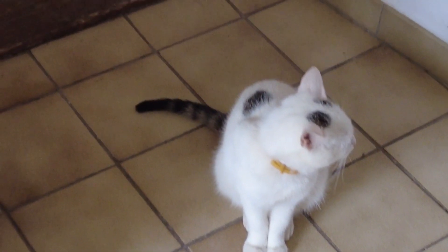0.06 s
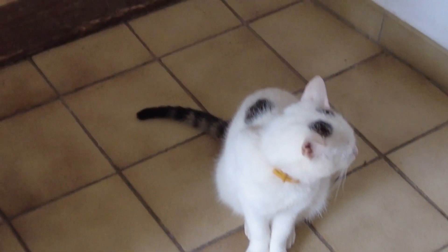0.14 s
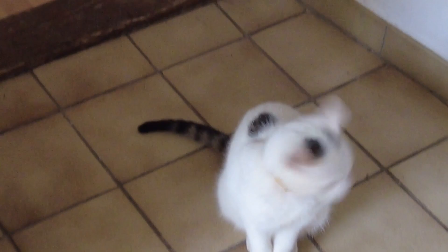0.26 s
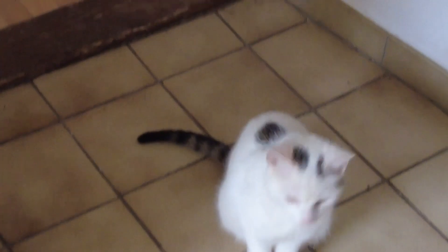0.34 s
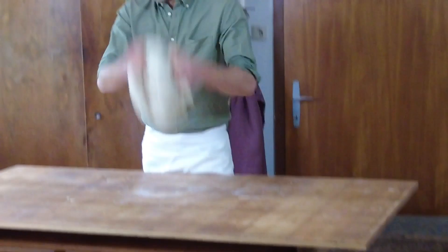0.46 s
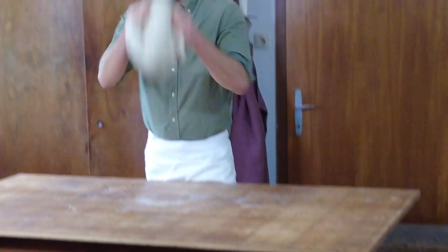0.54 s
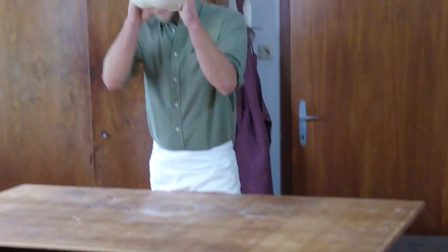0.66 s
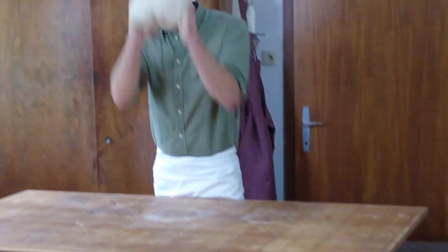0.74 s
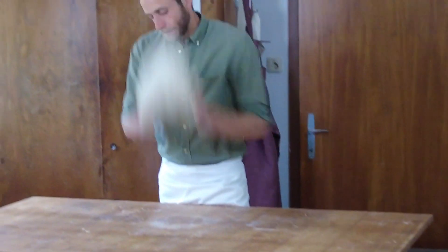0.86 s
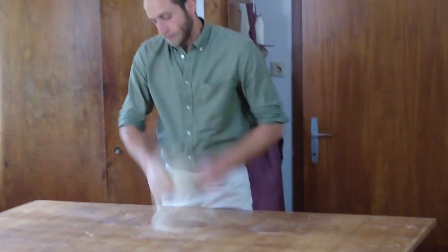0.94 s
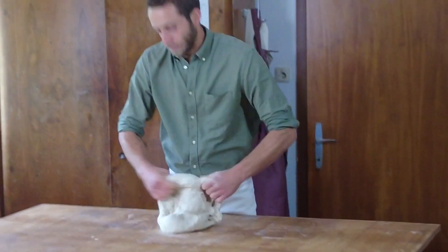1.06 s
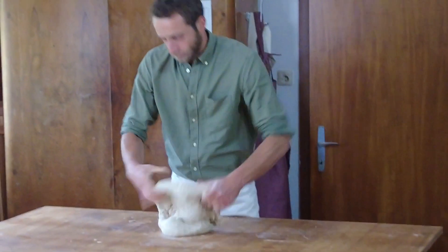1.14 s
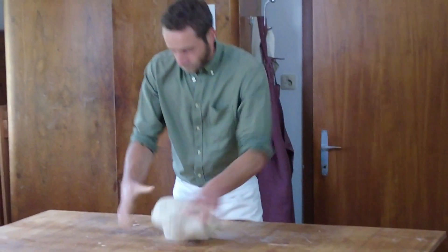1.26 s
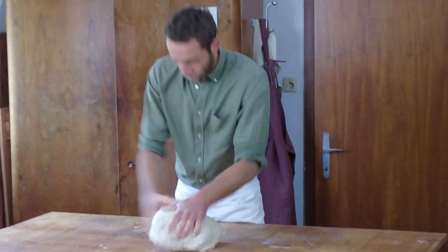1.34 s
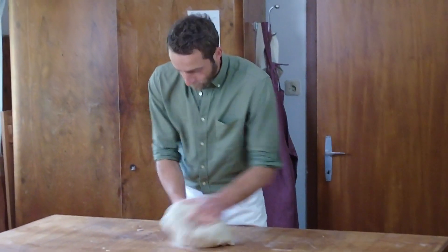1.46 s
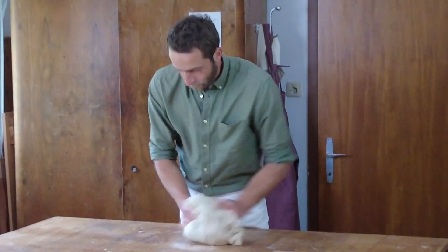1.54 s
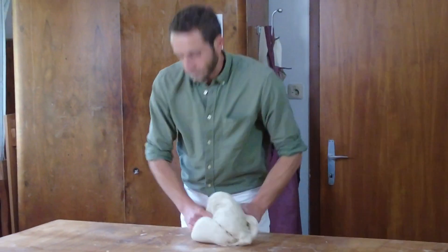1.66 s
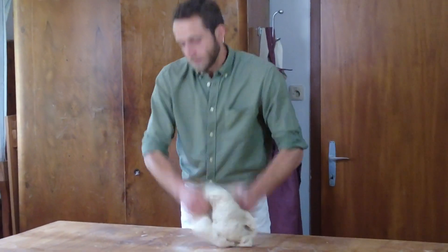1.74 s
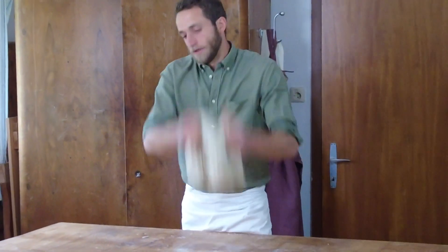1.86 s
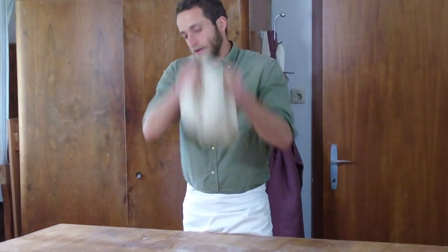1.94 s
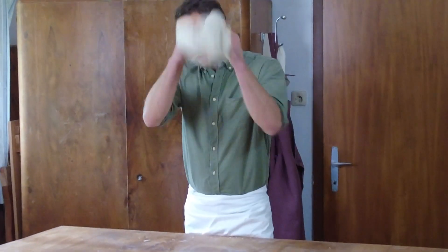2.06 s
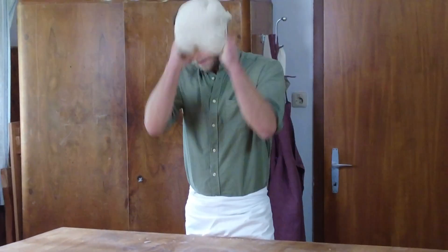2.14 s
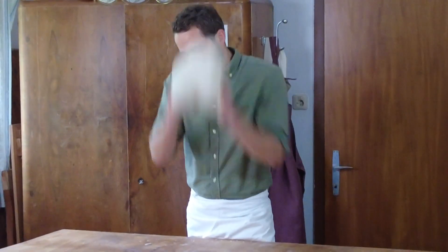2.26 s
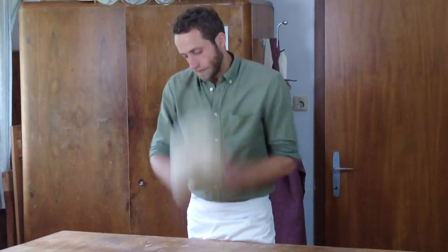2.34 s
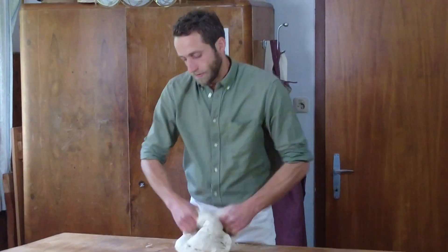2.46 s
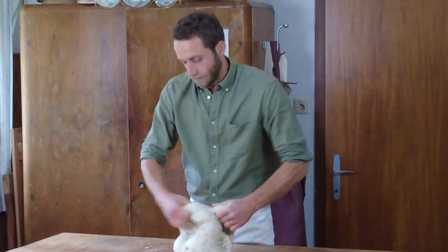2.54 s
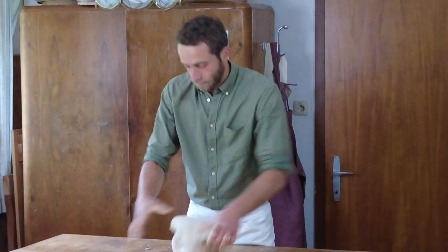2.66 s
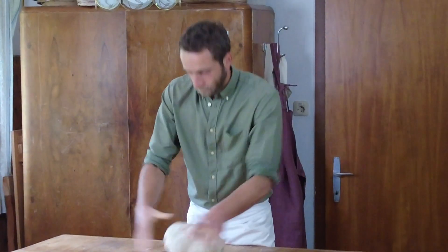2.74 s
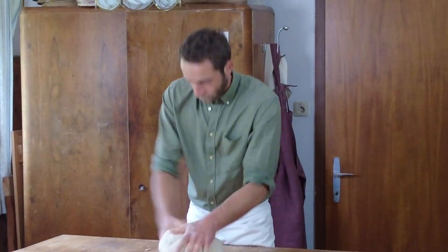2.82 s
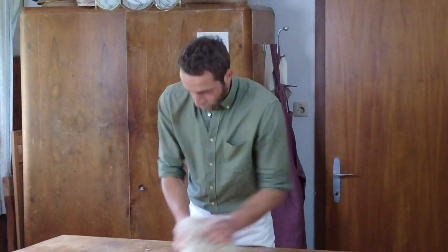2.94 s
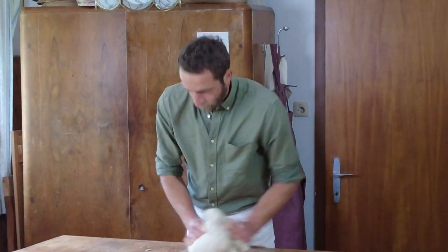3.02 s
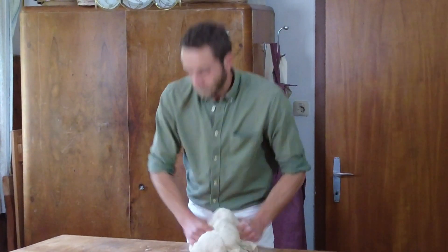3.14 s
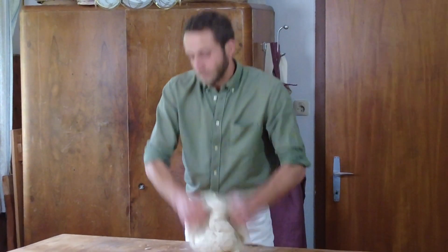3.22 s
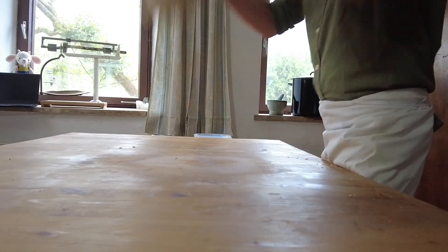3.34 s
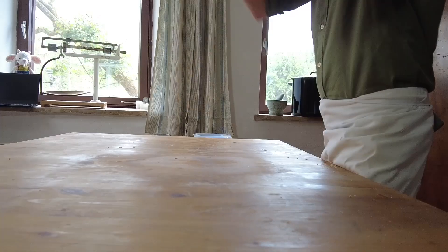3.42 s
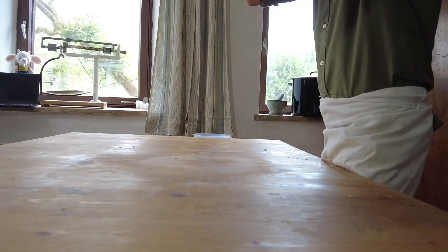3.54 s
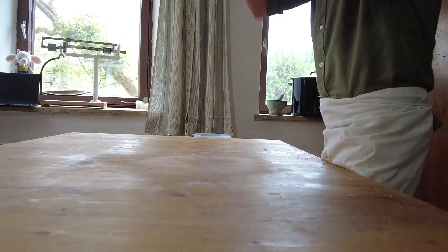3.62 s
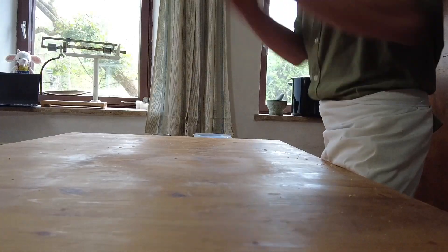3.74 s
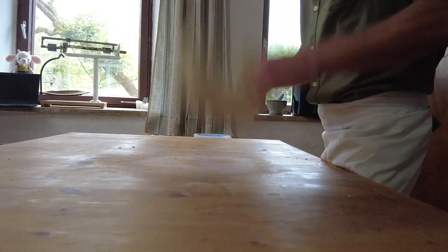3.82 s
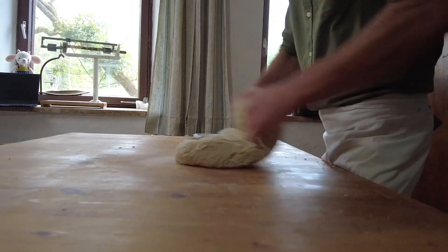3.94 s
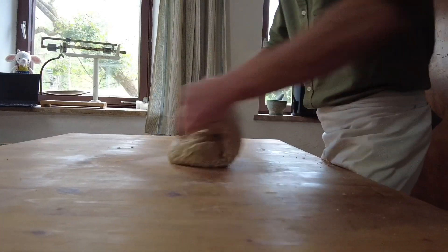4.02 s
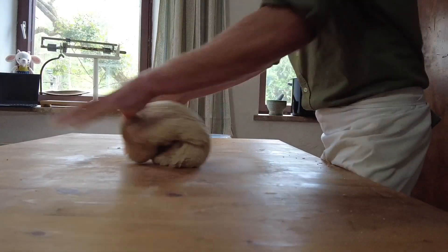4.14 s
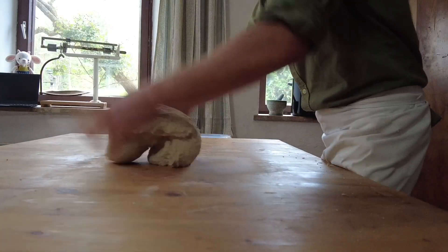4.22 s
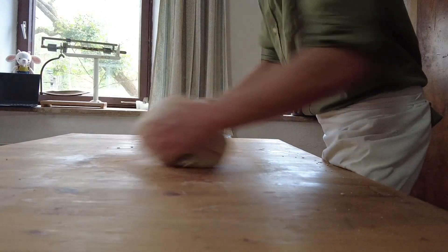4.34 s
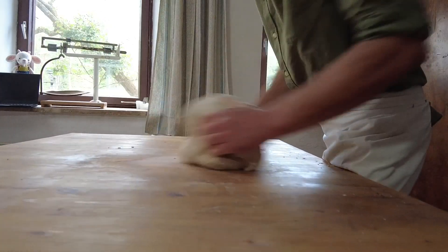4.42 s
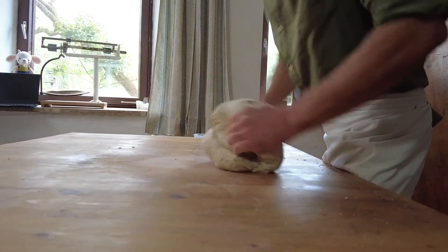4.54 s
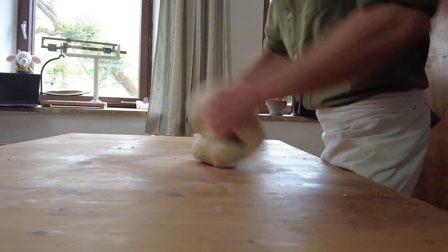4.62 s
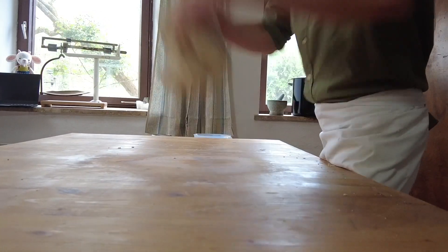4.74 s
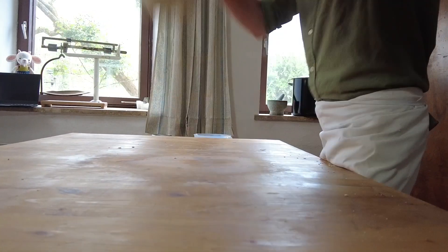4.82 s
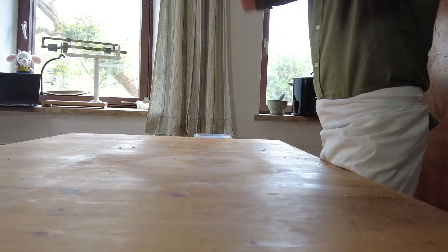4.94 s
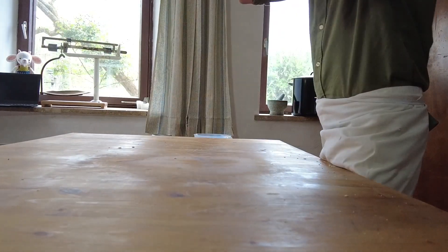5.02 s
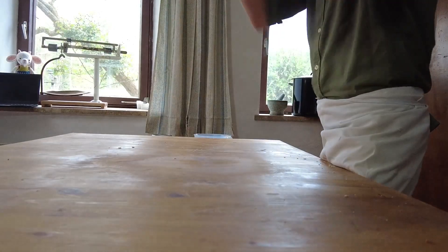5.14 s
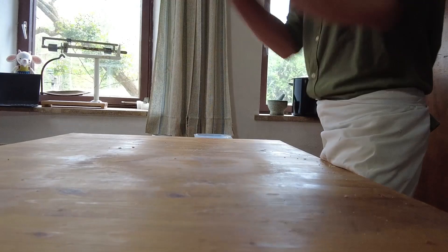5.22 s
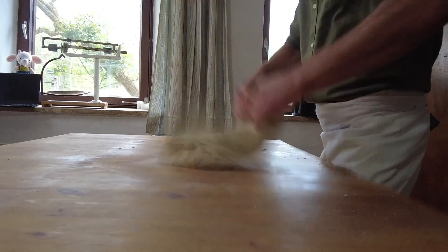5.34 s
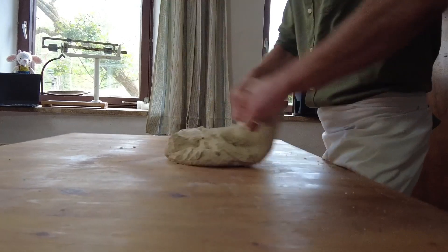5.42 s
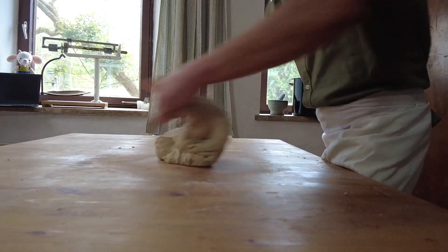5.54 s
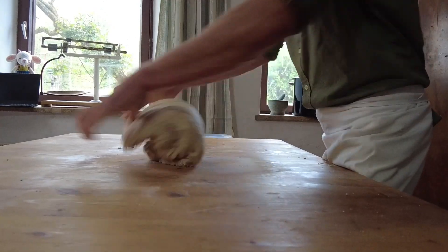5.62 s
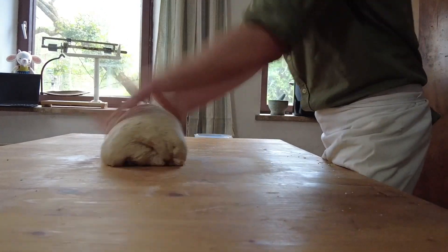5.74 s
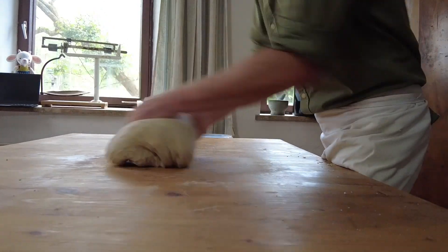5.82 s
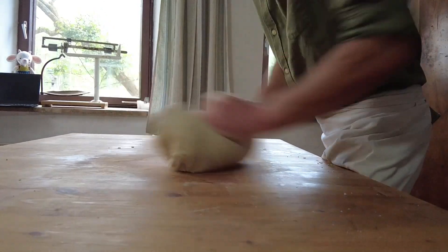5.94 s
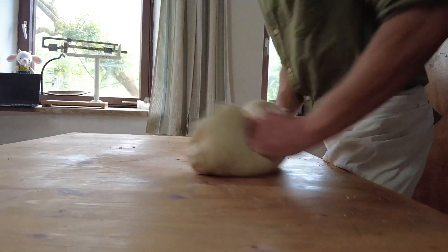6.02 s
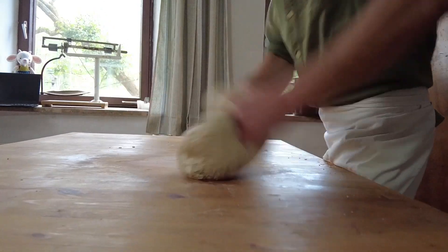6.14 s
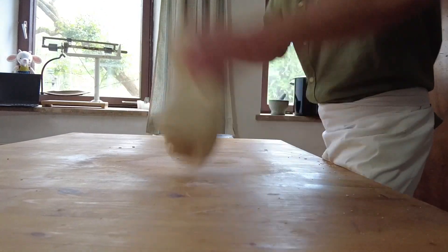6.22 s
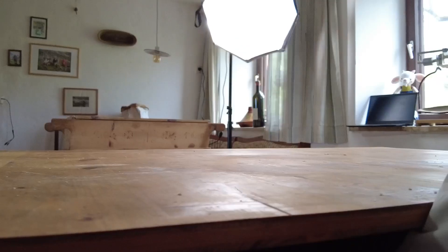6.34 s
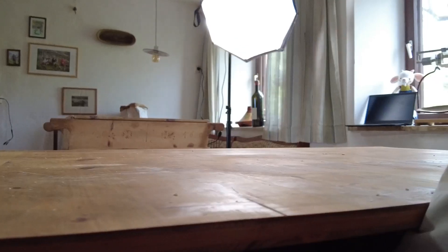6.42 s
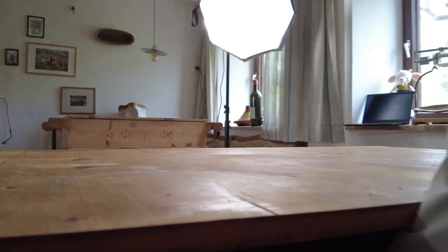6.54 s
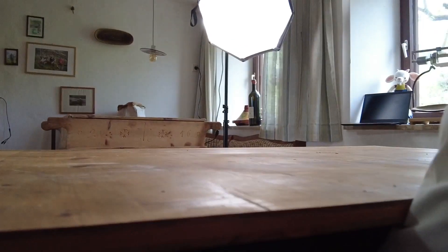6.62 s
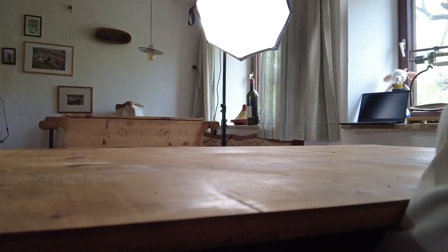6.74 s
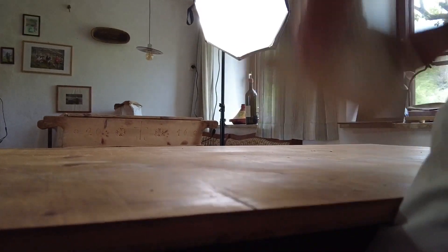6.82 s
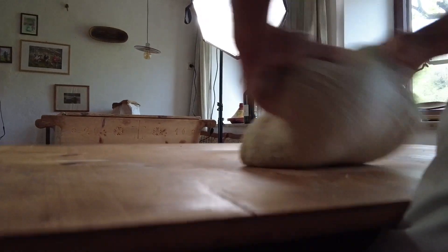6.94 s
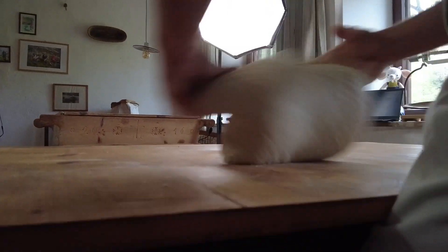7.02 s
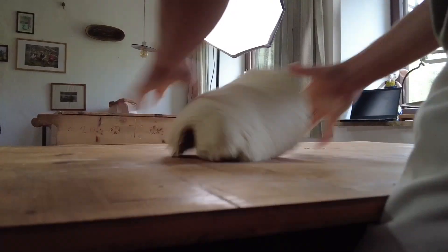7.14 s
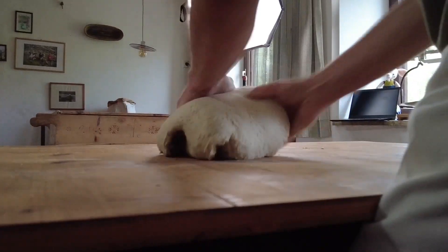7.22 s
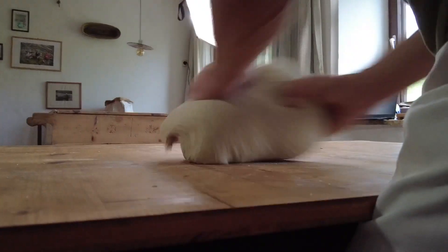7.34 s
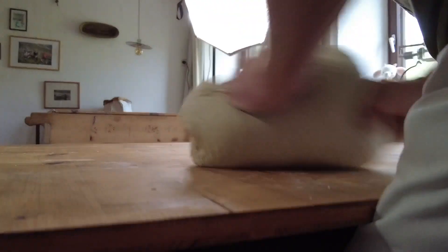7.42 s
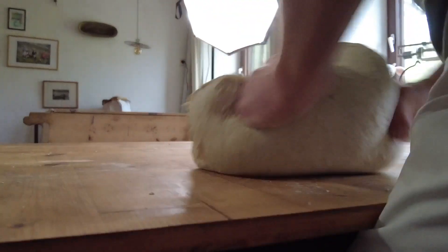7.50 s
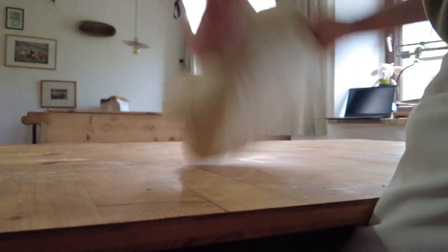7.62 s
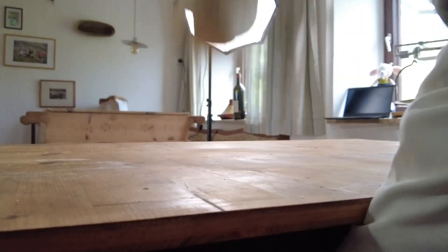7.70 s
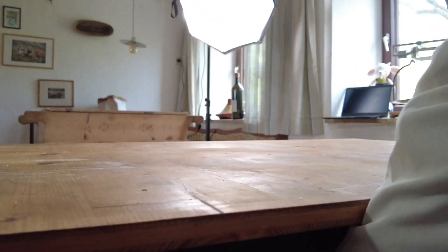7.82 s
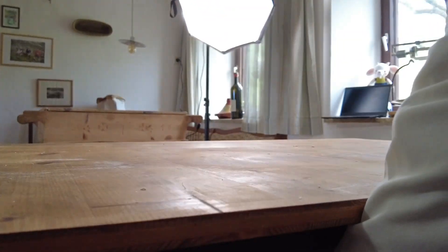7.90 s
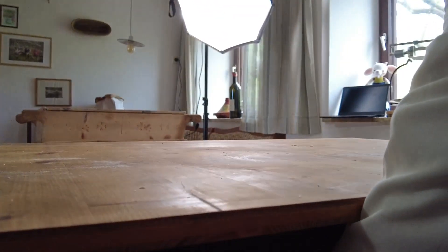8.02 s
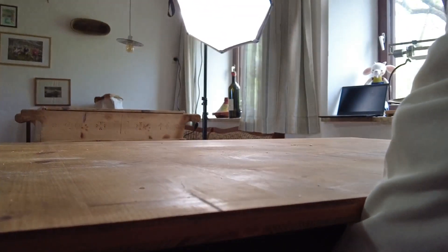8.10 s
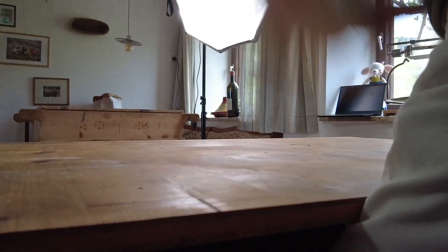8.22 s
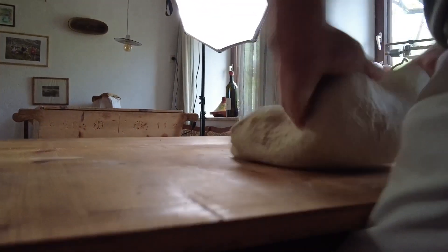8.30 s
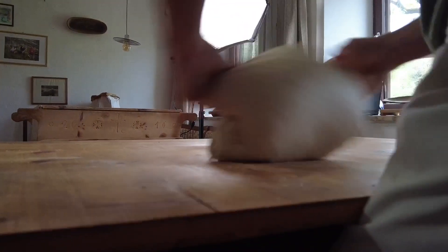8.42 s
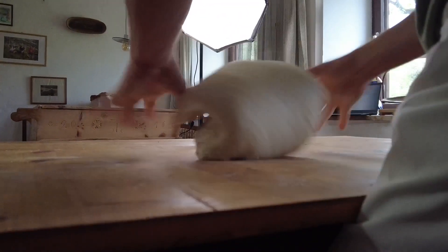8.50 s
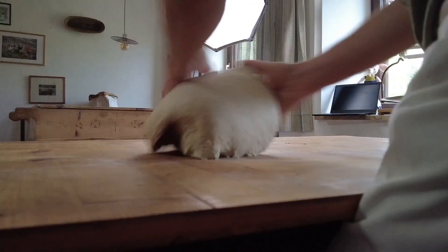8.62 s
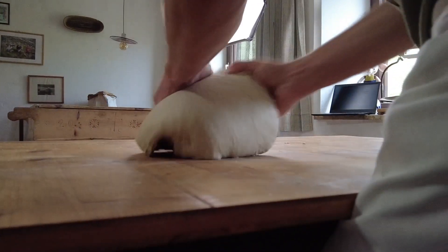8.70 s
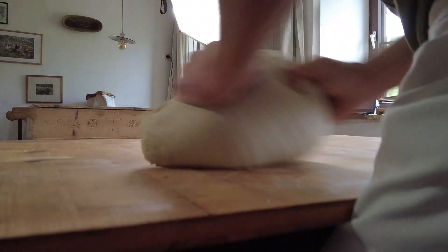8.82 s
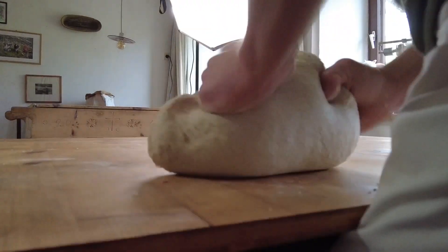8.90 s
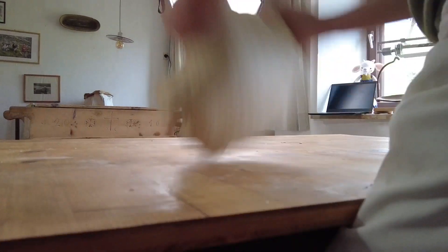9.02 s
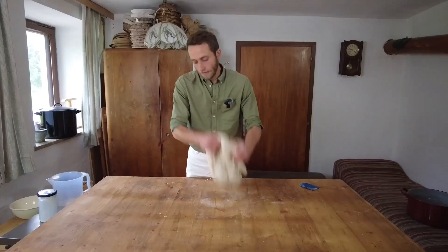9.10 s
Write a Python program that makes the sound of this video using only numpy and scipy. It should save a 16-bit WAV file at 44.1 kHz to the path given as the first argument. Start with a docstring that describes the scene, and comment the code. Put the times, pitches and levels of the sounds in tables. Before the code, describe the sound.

Six hard, booming dough slaps ring a big wooden table, growing closer, separated by dull thuds, squelches and faint sticky handling.

```python
"""A lump of dough tips onto a big wooden table with a dull thud and scrape, then a baker slams it six times.
Each slam is a crack of noise, ringing board modes, a late squelch, wall bounces and a decaying room tail.
Between slams hands pat, fold, grab, lift and catch the dough: coloured click bursts and damped thuds.
The microphone stands across a bare, echoing kitchen, then at the table's end, then at its edge;
a limiter ducks the slams above a steady faint hush."""
import sys
import numpy as np
from scipy import signal
from scipy.fft import rfft, irfft, next_fast_len
from scipy.io import wavfile
from scipy.ndimage import uniform_filter1d, map_coordinates

SR = 44100
rng = np.random.default_rng(int(sys.argv[2]) if len(sys.argv) > 2 else 0)


def wav_record(signal):
    """Record a signal, one row per channel, as 16-bit PCM in the file named by sys.argv[1]."""
    frames = np.transpose(np.atleast_2d(signal))
    bounded = np.clip(frames, -1, 1)
    # unit amplitude maps onto the largest positive 16-bit level
    quanta = np.round(bounded * 32767).astype(np.int16)
    wavfile.write(sys.argv[1], SR, quanta)


N = 403956
AGE = np.arange(2 * SR) / SR  # seconds since one sound began
CLOCK = np.arange(N) / SR  # seconds since the scene began

# All dB settings are relative: layer trims, the echo and the limiter follow.

# Dough hits the table. Each row: time in s, level in dB, crack in dB and table ring in dB against the level.
SLAMS = [(1.1060, -9, 2, -3), (2.554, -11, 0, -0.5), (3.9992, -6, 8, 0.5), (5.4940, -6.5, 11, 1.5),
         (6.9936, -1, 0.5, -2.5), (8.404, -5, 3, -1)]
# Slam echo spectra across the room, at the table's end, at its edge. Each row: frequency in Hz, dB per Hz.
SLAM_FAR = [(15, -39.5), (25, -10), (108, -12), (137, -0.5), (256, -3), (285, 0.5), (363, -3.5), (405, 1),
            (451, -9), (516, -5), (911, -11.5), (2220, -15), (6050, -30.5), (9570, -39.5), (16000, -69.5)]
SLAM_NEAR = [(15, -35), (25, -21), (43, -42), (76, -9), (108, -12), (309, 1.5), (344, -9.5), (516, -2.5),
             (591, -6.5), (734, -5.5), (863, -10), (2410, -15.5), (6560, -33), (16000, -54.5)]
SLAM_CLOSE = [(15, -55.5), (25, -20.5), (170, -7.5), (277, 0.5), (373, -7), (405, -5.5), (439, -8),
              (734, -12.5), (887, -17), (988, -11), (1070, -17.5), (1400, -15), (2280, -20.5),
              (6380, -36.5), (16000, -61.5)]
# Spectrum of air cracking out from under the dough. Each row: frequency in Hz, dB per Hz.
CRACK = [(30, -6.5), (120, 11.5), (300, 9), (900, -15.5), (1600, -2), (3000, -16), (7000, -23),
         (11000, -34), (16000, -50)]
# Hard walls return the crack. Each row: delay in s, level in dB.
WALLS = [(0.0128, -10), (0.0352, -8.5), (.078, -13), (0.115, -18)]


def slams():
    """Trapped air cracks out from under the dough, the table rings and the room fills."""
    track = np.zeros(N)
    for (s, db, crack_db, ring_db), tail in zip(SLAMS, echoes(len(SLAMS))):
        place = position(s)
        hollow_hz, hollow_db = POSITIONS[place][2:4]
        spectrum = (SLAM_FAR, SLAM_NEAR, SLAM_CLOSE)[place]
        crack = amp(db + crack_db) * colour(contact(0.0013, grain=0.79), CRACK)

        # reflections arrive in clumps; at the table they build up behind the crack
        echo = tail * swell(0.012 if place else 0.002) * flutter(rate_hz=170, depth_db=1.0)
        ring = amp(ring_db) * table_ring(scatter_db=1.0)
        ring += amp(hollow_db + 2) * hollow(hollow_hz, width_hz=150, t60_s=1.29)
        body = amp(db) * (colour(echo, spectrum) + ring * swell(0.002))
        add(track, s, crack + body)

        # the top of the lump flops down after its base and squelches as it spreads
        squelch = treble(contact(0.022, grain=1.0), hz=4000, db=-8.0)
        add(track, s + 0.06, amp(db - 7.5) * colour(squelch, spectrum))

        # each bounce off a wall comes back dull
        bounce = signal.sosfilt(signal.butter(3, 3500, fs=SR, output="sos"), crack)
        for delay_s, wall_db in WALLS:
            add(track, s + delay_s, amp(wall_db) * bounce)
    return track


# Table modes. Each row: frequency in Hz, level in dB, t60 in s.
TABLE = [(35.8, -25, 1.8), (71, -21.5, 1.2), (83.8, -13, 0.34), (112.2, -25, 1.1), (142.8, -12.5, 0.77),
         (229.5, -14, 0.73), (278, -7, 0.49), (304, -23.5, 0.27), (404.5, -20, 0.95), (520.7, -15, 0.66),
         (765, -22, 0.65), (974, -23.5, 0.6), (1211, -25, 0.29), (1257, -27.5, 0.87), (1500, -27.5, 0.73),
         (2117, -26, 0.62), (2320, -28.5, 0.29)]


def table_ring(scatter_db, weight_db=0):
    """The boards' modes ring at new strengths for every blow; weight shifts those below 200 Hz."""
    hz, db, t60_s = np.transpose(TABLE)[:, :, None]
    strength_db = db + scatter_db * rng.standard_normal(db.shape) + weight_db * (hz < 200)
    modes = amp(strength_db - 60 * AGE / t60_s) * np.sin(2 * np.pi * hz * AGE)
    return np.sum(modes, axis=0)


def through_boards(x, ring_db):
    """Handwork sets the table's modes above 300 Hz ringing faintly."""
    ring = sum(amp(-60 * AGE / t60_s) * np.sin(2 * np.pi * hz * AGE)
               for hz, _, t60_s in TABLE if hz > 300)
    return x + amp(ring_db) * signal.fftconvolve(x, ring / np.linalg.norm(ring))[:N]


def hollow(hz, width_hz, t60_s):
    """A cluster of close board modes that beat as they fade: a random-phase noise band."""
    f = np.fft.rfftfreq(len(AGE), 1 / SR)
    phase = np.exp(2j * np.pi * rng.random(len(f)))
    cluster = irfft(phase / (1 + (2 * (f - hz) / width_hz) ** 4))
    return cluster / cluster.std() * amp(-60 * AGE / t60_s)


def knock(hz, seconds):
    """A few cycles of the boards, damped at once by the dough lying on them."""
    u = AGE / seconds
    return u * np.exp(1 - u) * np.sin(2 * np.pi * hz * AGE)


# Spectra of the soft thud and of the deep table boom. Each row: frequency in Hz, dB per Hz.
BUMP = [(25, -24.5), (150, -1.5), (220, -6), (290, 0), (380, -9), (600, -14.5), (1000, -38.5), (3000, -41),
        (9000, -68.5)]
BOOM = [(15, -4), (32, -1.5), (48, -7), (72, -3), (110, -8.5), (200, -18), (600, -59.5), (3000, -69.5)]


def bumps(rows):
    """The soft lump thuds and its weight shakes the table; rows of (s, level dB, deep boom dB)."""
    thud, boom, wood = np.zeros((3, N))
    for (s, db, boom_db), tail in zip(rows, echoes(len(rows))):
        place = POSITIONS[position(s)]
        push = amp(db) * tail * swell(0.014)
        add(thud, s, push)
        add(boom, s, amp(boom_db) * push)

        direct = amp(place[4] - 9.5) * knock(hz=271.7, seconds=0.0094)
        deep = amp(boom_db - 14.0) * knock(hz=76.6, seconds=0.0061)
        ring = amp(-13.5) * table_ring(scatter_db=1.5, weight_db=boom_db + 9.5) * swell(0.0014)
        ring += amp(-22.5) * hollow(place[2], width_hz=130, t60_s=0.62) * swell(0.0084)
        add(wood, s, amp(db) * (direct + ring + deep))
    return wood + amp(-11.5) * colour(thud, BUMP) + amp(-12.5) * colour(boom, BOOM)


# Spectrum of palm on dough. Each row: frequency in Hz, dB per Hz.
PAT = [(60, -15), (300, 4), (700, 2), (1400, -1), (2200, -4.5), (3200, -14), (5000, -29), (8000, -34.5),
       (16000, -58)]


def pats(rows):
    """Palms meet the dough in short bursts; rows of (s, level dB, contact s)."""
    return amp(-4) * through_boards(touches(rows, PAT, grain=0.74, room_db=-12.5), ring_db=-24)


# Spectrum of sticky dough tearing off skin. Each row: frequency in Hz, dB per Hz.
PEEL = [(200, -24), (1000, -10.5), (2500, 1.5), (4500, -4.5), (8500, -11), (11500, -23), (16000, -26)]


def peels(rows):
    """Sticky dough tears off skin in bright clicks; rows of (s, level dB, contact s)."""
    return amp(-2) * touches(rows, PEEL, grain=0.42, room_db=-10.5)


# Spectrum of sliding strokes. Each row: frequency in Hz, dB per Hz.
RUB = [(100, -2), (350, 6), (700, 2), (2200, -4.5), (4500, -13.5), (8500, -20), (12000, -30), (16000, -40)]


def rubs(rows):
    """Strokes, bright over dry flour, dull over damp dough; rows of (s, level dB, contact s, brightness dB)."""
    track = np.zeros(N)
    for (s, db, seconds, bright_db), tail in zip(rows, echoes(len(rows))):
        stroke = touch(s, seconds, tail, grain=1.0, room_db=-4.5) * swell(seconds / 2)
        add(track, s, amp(db) * treble(stroke, hz=2250, db=bright_db))
    return amp(-7) * through_boards(colour(track, RUB), ring_db=-26.5)


PAT_S, TEAR_S = 0.0034, 0.0014  # time to the peak of a palm contact and of a sticky tear
SCRAPE_LEAD_S = 0.01  # the scrape starts just before the thud
DRAG_AFTER_S, DRAG_S, DRAG_DB = 0.05, 0.046, -16  # level against the scrape
# Hands close on the lump and tip it. Each row: start in s, palm in dB, sticky tear in dB,
# delay to the tip in s, thud in dB, deep boom in dB against the thud, scrape in dB.
GRABS = [(-.05, -37.5, -51, .045, -28, -10, -34.5), (1.688, -49, -62.5, .079, -42, -12, -44),
         (3.148, -59, -67, .04, -50, -14.5, -43), (4.574, -48.5, -49.5, .042, -21, -6.5, -32.5),
         (6.097, -50, -53.5, .063, -27, 0, -32.5), (7.5646, -37, -36, .018, -22.5, -11, -31.5),
         (9.0136, -36, -43, .016, -21.5, -19.5, -33.5)]


def grabs(scrape_s=0.014, scrape_bright_db=-12, drag_bright_db=5):
    """Hands clap on and stick; the lump tips with a thud and dull scrape, then drags over flour."""
    palms, tears, thuds, strokes = [], [], [], []
    for s, palm_db, tear_db, tips_after_s, thud_db, boom_db, scrape_db in GRABS:
        tipped_s = s + tips_after_s
        palms.append((s, palm_db, PAT_S))
        tears.append((s, tear_db, TEAR_S))
        thuds.append((tipped_s, thud_db, boom_db))
        strokes.append((tipped_s - SCRAPE_LEAD_S, scrape_db, scrape_s, scrape_bright_db))
        strokes.append((tipped_s + DRAG_AFTER_S, scrape_db + DRAG_DB, DRAG_S, drag_bright_db))
    return pats(palms) + peels(tears) + bumps(thuds) + rubs(strokes)


LIFT_BOOM_DB = -16.5  # little weight is left on the table
STRETCH_AFTER_S, STRETCH_S = 0.16, 0.034
STRETCH_DB, STRETCH_BRIGHT_DB = -17.5, 9.5  # level against the slide
# The lump leaves the boards. Each row: start in s, thud in dB, smack in dB, sticky tear in dB,
# slide in dB, slide contact in s, slide brightness in dB.
LIFTS = [(.485, -51, -65.5, -67.5, -53.5, 0.006, -5), (1.896, -53, -65, -66.5, -65.5, .016, 7),
         (3.3142, -37, -55, -55.5, -46.5, .03, 7), (4.767, -31.5, -35, -55.5, -33, 0.0082, -12),
         (6.318, -30.5, -49.5, -56.5, -42.5, 0.019, 6), (7.761, -31.5, -45.5, -59, -45, 0.0115, -1)]


def lifts(smack_s=0.003, tear_s=0.002):
    """The lump unsticks with a smack and a thud, slides off and stretches through the fingers."""
    thuds, smacks, tears, strokes = [], [], [], []
    for s, thud_db, smack_db, tear_db, slide_db, slide_s, bright_db in LIFTS:
        thuds.append((s, thud_db, LIFT_BOOM_DB))
        smacks.append((s, smack_db, smack_s))
        tears.append((s, tear_db, tear_s))
        strokes.append((s, slide_db, slide_s, bright_db))
        strokes.append((s + STRETCH_AFTER_S, slide_db + STRETCH_DB, STRETCH_S, STRETCH_BRIGHT_DB))
    return bumps(thuds) + pats(smacks) + peels(tears) + rubs(strokes)


# The dough is folded and the fingers pull free. Each row: start in s, sticky tear in dB, flap in dB, slide in dB.
FOLDS = [(1.4918, -55, -49, -67), (2.9482, -56.5, -47.5, -59), (4.3854, -50, -51, -54.5),
         (5.8977, -37.5, -30, -36), (7.3452, -29, -35.5, -43), (8.757, -40.5, -43, -40)]


def folds(tear_s=0.00093, slide_s=0.018, bright_db=7):
    """The folded flap lands while the fingers tear free and slide off."""
    tears = peels([(s, db, tear_s) for s, db, _, _ in FOLDS])
    flaps = pats([(s, db, PAT_S) for s, _, db, _ in FOLDS])
    slides = rubs([(s, db, slide_s, bright_db) for s, _, _, db in FOLDS])
    return tears + flaps + slides


CATCH_S, CATCH_BOOM_DB = 0.005, -7.5
# Hands catch the dough in the air. Each row: start in s, palm in dB, sticky tear in dB, thud in dB.
CATCHES = [(.865, -51.5, -62, -51.5), (2.346, -48.5, -55, -53), (3.525, -57.5, -76, -44),
           (5.1305, -48.5, -43, -49.5), (6.708, -44.5, -57, -35.5), (8.134, -57.5, -64, -49.5)]


def catches(tear_s=0.0023):
    """The dough lands in the hands: a soft clap, a sticky smack and a dull thud at once."""
    claps = pats([(s, db, CATCH_S) for s, db, _, _ in CATCHES])
    smacks = peels([(s, db, tear_s) for s, _, db, _ in CATCHES])
    thuds = bumps([(s, db, CATCH_BOOM_DB) for s, _, _, db in CATCHES])
    return claps + smacks + thuds


FINGERS_FROM_S, FINGERS_SPAN_S = 0.26, 0.33  # after each slam
FINGERS_DB, FINGERS_FADE_DB_PER_S = -28, 38
ACROSS_ROOM_DB = -17  # extra loss of the random pats and sticky ticks heard from across the room
# Pats on the dough at set times. Each row: start in s, level in dB, contact in s.
PATS = [(1.5538, -46, 0.0052), (1.7647, -46.5, .003), (4.323, -30, 0.0027), (4.4791, -37, 0.0011),
        (5.457, -43.5, .003), (5.7399, -27.5, .004), (5.823, -30, 0.0022), (7.4762, -35, 0.0067),
        (7.8406, -41, 0.0035), (8.7248, -34.5, .0026), (8.9275, -40, 0.005)]


def patting():
    """Pats at set times, plus two more at random after each slam, weaker the later they fall."""
    delays_s = FINGERS_SPAN_S * rng.random((len(SLAMS), 2))
    random_pats = []
    for (s, *_), row in zip(SLAMS, delays_s):
        distance_db = 0 if position(s) else ACROSS_ROOM_DB
        for delay_s in row:
            db = FINGERS_DB - FINGERS_FADE_DB_PER_S * delay_s + distance_db
            random_pats.append((s + FINGERS_FROM_S + delay_s, db, PAT_S))
    return pats(PATS + random_pats)


CRACKLE_PER_S, CRACKLE_DB = 81, -38
WORK_FROM_S, WORK_S = 0.22, 0.62  # start after a slam, and duration
# Spectrum of the sticky ticks. Each row: frequency in Hz, dB per Hz.
CRACKLE = [(200, -16.5), (900, -1), (1700, -0.5), (2600, -12), (4000, -19), (9000, -33), (16000, -62.5)]


def crackle(scatter_db=3.0, room_db=-4):
    """Skin and dough stick and let go in tiny random ticks for a while after each slam."""
    ticks = np.zeros(N)
    for s, *_ in SLAMS:
        chance, size = rng.random(SR), rng.standard_normal(SR)
        fires = (chance < CRACKLE_PER_S / SR) * (AGE[:SR] < WORK_S)
        burst = fires * np.sign(size) * amp(scatter_db * np.abs(size))
        distance_db = 0 if position(s) else ACROSS_ROOM_DB
        add(ticks, s + WORK_FROM_S, amp(CRACKLE_DB + distance_db) * burst)
    tail = echoes(1)[0]
    wet = signal.fftconvolve(ticks, tail / np.linalg.norm(tail))[:N]
    return colour(ticks + amp(room_db) * wet, CRACKLE)


RAISE_BEFORE_S, RAISE_S, RAISE_DB = 0.59, 0.07, -62
SWING_BEFORE_S, SWING_S, SWING_DB = 0.11, 0.056, -62


def swings(bright_db=-2, raise_bright_db=8):
    """Sleeves rustle as the arms rise and swish as they fall; left out across the room as too faint."""
    near = [s for s, *_ in SLAMS if position(s)]
    raises = [(s - RAISE_BEFORE_S, RAISE_DB, RAISE_S, raise_bright_db) for s in near]
    falls = [(s - SWING_BEFORE_S, SWING_DB, SWING_S, bright_db) for s in near]
    return rubs(raises + falls)


# Spectrum of the kitchen's hush. Each row: frequency in Hz, dB per Hz.
QUIET = [(20, -5), (60, -3), (150, -14.5), (350, -12.5), (700, -15.5), (2000, -19), (5000, -25),
         (9000, -30), (16000, -51)]


def room_tone():
    """The faint steady hush of the kitchen, a little louder at the table: coloured noise."""
    level_db = np.where(position(CLOCK), -73, -78)
    return amp(level_db) * colour(rng.standard_normal(N), QUIET)


# Kitchen echo. Each row: frequency in Hz, t60 in s.
KITCHEN = [(30, 1.2), (70, 0.53), (170, 0.6), (330, 0.54), (550, 0.58), (1200, 0.56), (3200, .52),
           (8400, 0.41), (15000, 0.19)]


def echoes(count):
    """Fresh noise tails that start near rms 1 and decay by band, the top treble fastest."""
    hz, t, z = signal.stft(rng.standard_normal((count, SR + SR // 2)), SR, nperseg=512)
    decay = amp(-60 * t / along(KITCHEN, hz)[:, None])
    tails = signal.istft(z * decay, nperseg=512)[1]
    return np.pad(tails, ((0, 0), (0, len(AGE) - tails.shape[1])))


# Microphone across the room, at the table's end, at its edge. Each row: start in s,
# limiter ceiling in dB, hollow ring in Hz, hollow ring in dB, direct sound in dB.
POSITIONS = [(0, -18.5, 370, -25.5, -7.5), (3.501, -10.5, 310.5, -17.5, -2), (6.45, -12.5, 273, -23, 0.5)]


def position(s):
    """Index of the microphone position at time s."""
    return np.searchsorted(np.array(POSITIONS)[1:, 0], s)


def touch(s, seconds, tail, grain, room_db):
    """One soft contact and its echo; the echo weighs more where the direct sound is weaker."""
    wet = amp(room_db - POSITIONS[position(s)][4])
    return (contact(seconds, grain) + wet * tail * swell(2 * seconds)) / np.hypot(1, wet)


def touches(rows, spectrum, grain, room_db):
    """Short contacts of one kind, coloured together; rows of (s, level dB, contact s)."""
    track = np.zeros(N)
    for (s, db, seconds), tail in zip(rows, echoes(len(rows))):
        add(track, s, amp(db) * touch(s, seconds, tail, grain, room_db))
    return colour(track, spectrum)


def contact(seconds, grain):
    """A burst of tiny sticking and tearing clicks whose envelope peaks after the given seconds."""
    u = AGE / max(seconds, 1 / SR)
    clicks = rng.standard_normal(len(AGE)) * np.exp(grain * rng.standard_normal(len(AGE)))
    return crest(clicks * u * np.exp(-u), size=220)


def crest(x, size):
    """Scale x so that its loudest stretch of size samples has rms 1."""
    return x / np.sqrt(uniform_filter1d(x * x, size).max())


def swell(seconds):
    """Exponential rise from silence to 1 with the given time constant."""
    return 1 - np.exp(-AGE / max(seconds, 1 / SR))


def flutter(rate_hz, depth_db):
    """A gain that wavers at random, with rate_hz new values a second."""
    knots = rng.standard_normal(int(AGE[-1] * rate_hz) + 4)
    return amp(depth_db * map_coordinates(knots, [AGE * rate_hz]))


def treble(x, hz, db):
    """Raise or lower what lies above hz with a first-order shelf."""
    low = signal.sosfilt(signal.butter(1, min(hz, SR / 3), fs=SR, output="sos"), x)
    return low + amp(db) * (x - low)


def colour(x, points):
    """Causal minimum-phase filter with the given spectrum; white noise keeps its power."""
    m = 2 * next_fast_len(len(x) // 2 + 4096)
    gain = amp(along(points, np.fft.rfftfreq(m, 1 / SR)))
    cepstrum = irfft(np.log(gain / np.sqrt(np.mean(gain ** 2))))
    # folding the cepstrum forward makes the filter causal
    cepstrum[1:m // 2] *= 2
    cepstrum[m // 2 + 1:] = 0
    return irfft(rfft(x, m) * np.exp(rfft(cepstrum)))[:len(x)]


def along(points, hz):
    """(Hz, value) points read on a log frequency axis."""
    f, v = np.transpose(points)
    return np.interp(np.log(hz + 1), np.log(f + 1), v)


def amp(db):
    """Decibels to gain."""
    return 10 ** (np.asarray(db) / 20)


def add(track, s, x):
    """Mix x into the track at time s; a sound may have begun before time zero."""
    start = round(s * SR)
    x = x[max(-start, 0):]
    part = track[max(start, 0):][:len(x)]
    part += x[:len(part)]


def scene():
    """The slams, the handwork between them and the quiet room at one microphone."""
    handwork = grabs() + lifts() + folds() + catches() + patting() + crackle()
    return (slams() + handwork + swings() + room_tone())[None]


def limiter(x, ceiling_db, release_db_per_s):
    """The gain ducks at once under a loud sound and then climbs back steadily."""
    power = np.abs(uniform_filter1d(x * x, size=260)) + 1e-12
    needed_db = np.minimum(0, ceiling_db - 10 * np.log10(power))
    climb_db = release_db_per_s * CLOCK
    gain_db = np.minimum.accumulate(needed_db - climb_db) + climb_db
    return x * amp(uniform_filter1d(gain_db, size=60))


TOP_HZ = 15900


def record(dry):
    """A limiter with a ceiling for each position, peaks rounded below 0.8, nothing from TOP_HZ up."""
    ceiling_db = np.array(POSITIONS)[position(CLOCK), 1]
    held = limiter(dry[0], ceiling_db, release_db_per_s=134.0)
    rounded = held / (1 + (held / 0.8) ** 8) ** (1 / 8)
    m = next_fast_len(N + SR // 2)
    passband = np.fft.rfftfreq(m, 1 / SR) < TOP_HZ
    return irfft(rfft(rounded, m) * passband, m)[None, :N]


dry = scene()
out = record(dry)
wav_record(out)
```